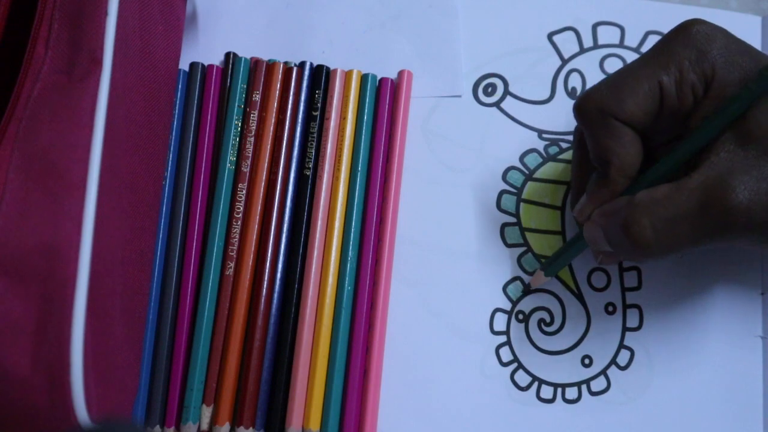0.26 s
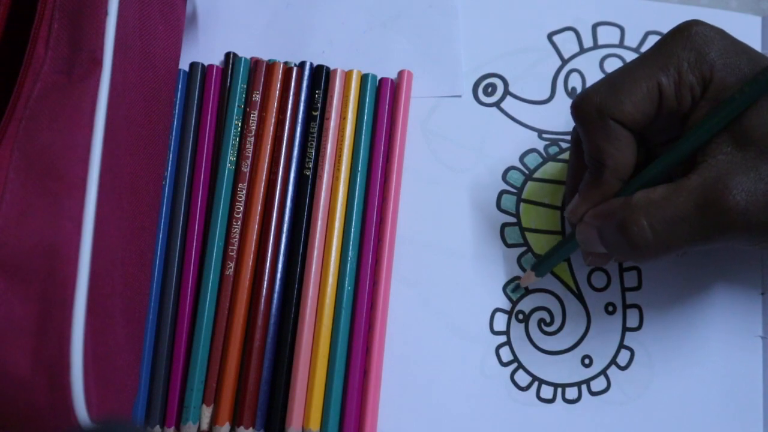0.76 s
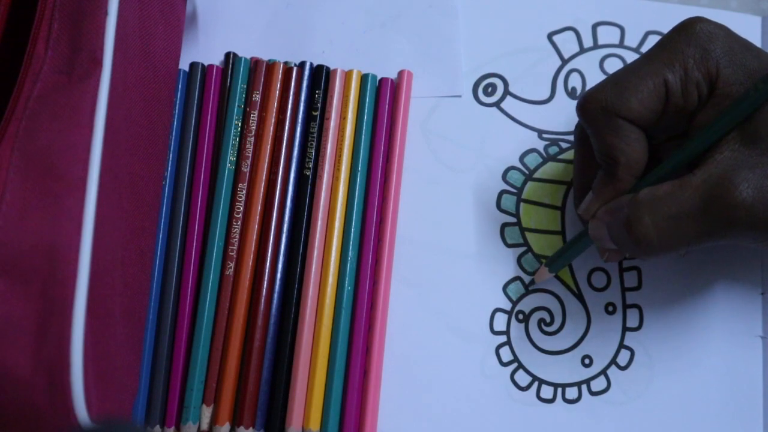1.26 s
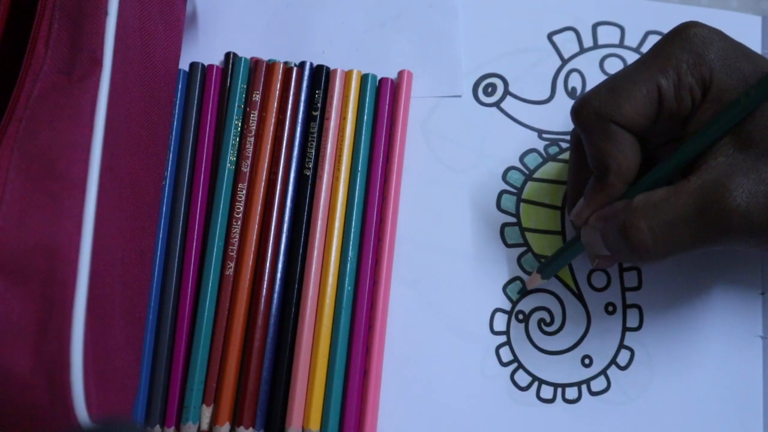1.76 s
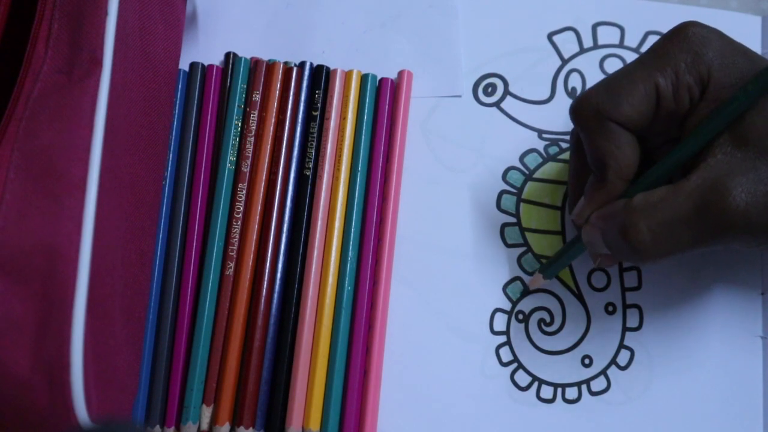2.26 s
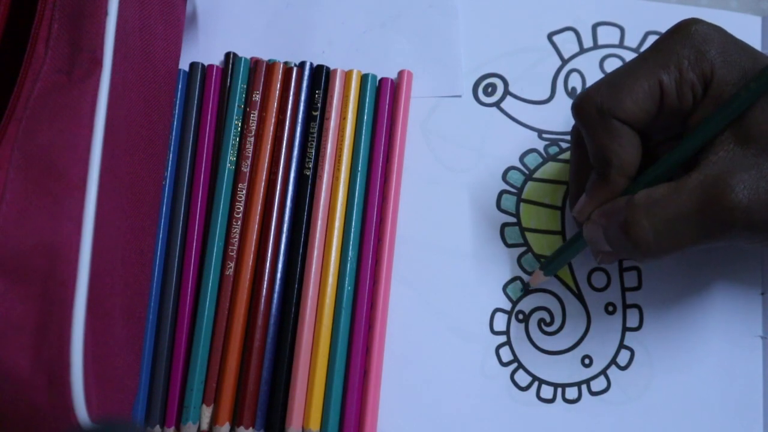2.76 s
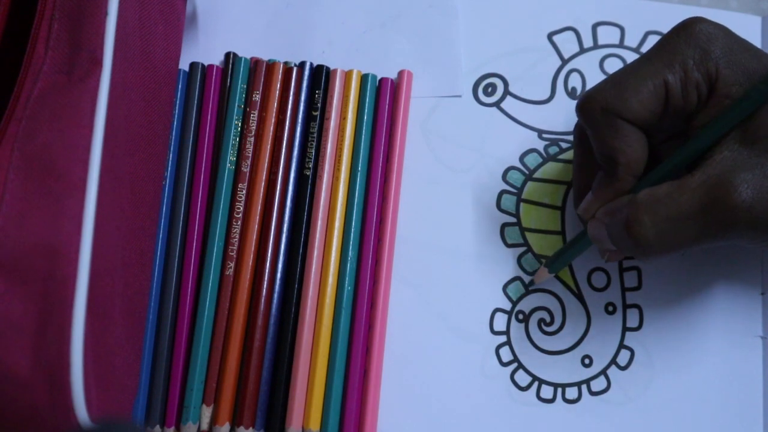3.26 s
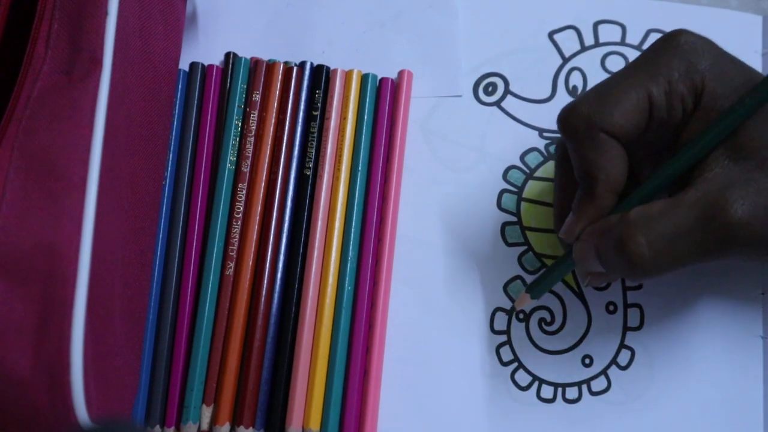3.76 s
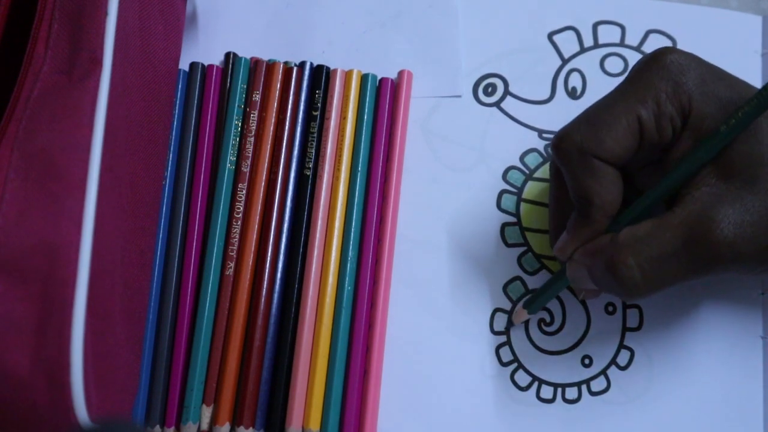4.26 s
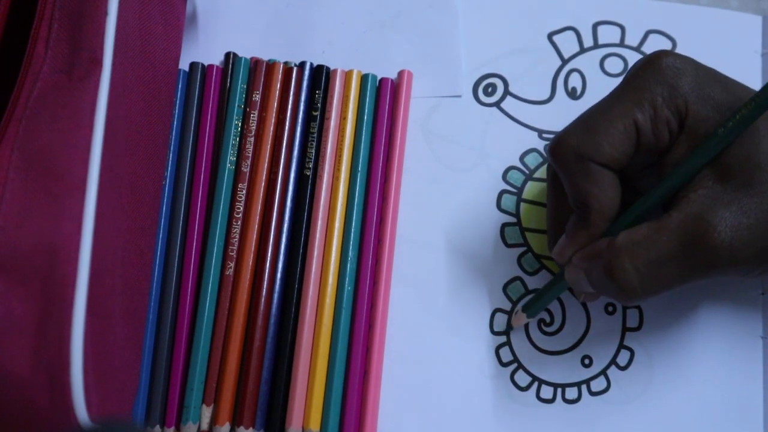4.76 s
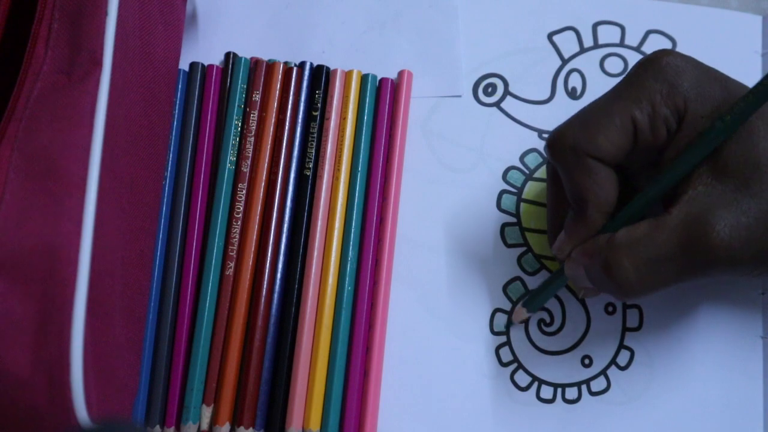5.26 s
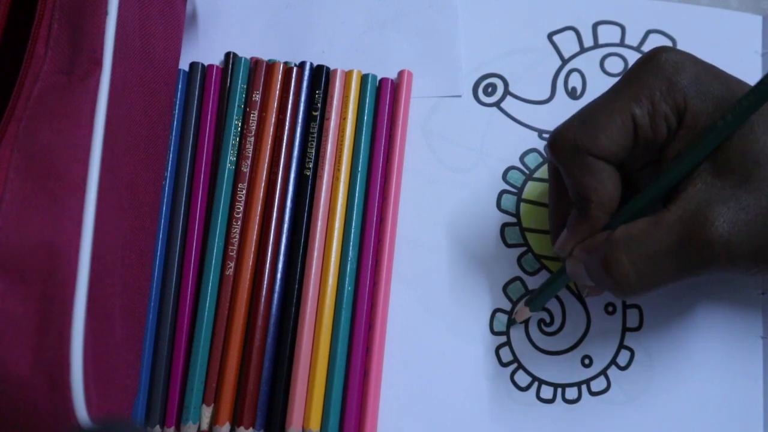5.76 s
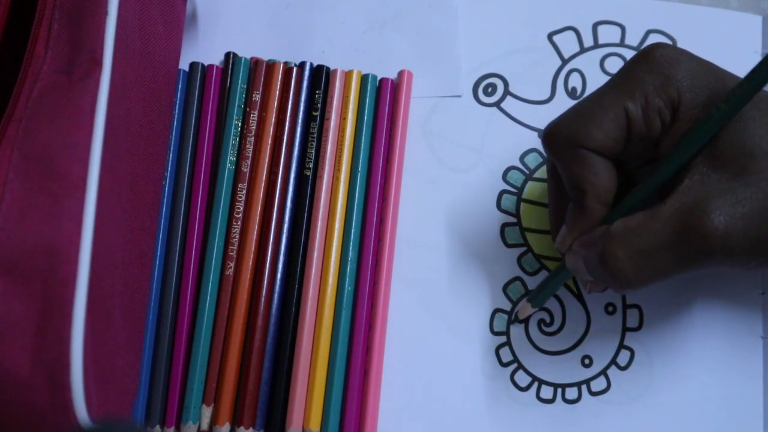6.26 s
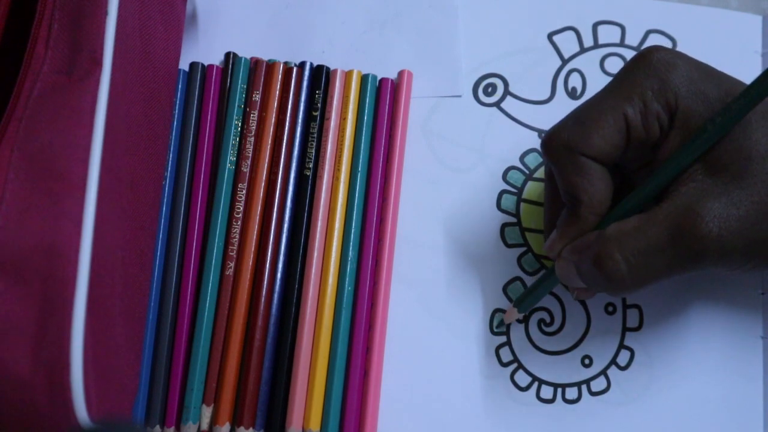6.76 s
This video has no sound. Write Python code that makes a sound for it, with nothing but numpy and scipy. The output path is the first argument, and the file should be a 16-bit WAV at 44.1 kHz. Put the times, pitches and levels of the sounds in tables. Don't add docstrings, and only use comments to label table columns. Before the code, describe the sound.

A coloured pencil scratches paper in quick back-and-forth strokes, pauses briefly with a tiny tap, then resumes, over quiet room hum.

```python
import sys
import numpy as np
from scipy import signal
from scipy.io import wavfile
from scipy.ndimage import uniform_filter1d

SR = 44100
rng = np.random.default_rng(int(sys.argv[2]) if len(sys.argv) > 2 else 0)


def linear_from_db(decibels):
    return 10 ** (np.asarray(decibels, float) / 20)


def to_wav(sig):
    pcm = np.clip(np.atleast_2d(sig), -1, 1) * 32767
    pcm = np.round(pcm).astype(np.int16)
    wavfile.write(sys.argv[1], SR, pcm.T)


N = 309141


def evened(x):
    return x / np.sqrt(np.mean(abs(x) ** 2) + 1e-20)


def read(points, hz):
    f, value = np.transpose(points)
    return np.interp(np.log(hz + 1), np.log(f + 1), value)


def wander(rate_hz):
    low_pass = signal.butter(2, rate_hz, fs=SR, output="sos")
    return evened(signal.sosfilt(low_pass, rng.standard_normal(N + SR))[SR:])


def strokes():
    # (start [s], length [s], level [dB])
    first_patch = [(0.0, 0.056, -46.5), (.106, 0.08, -50.5), (.236, 0.078, -50.5), (.351, 0.08, -49.5),
                   (.473, 0.083, -50), (.609, 0.06, -46.5), (.719, 0.062, -46.5), (.824, .064, -48.5),
                   (.93, .16, -53.5), (1.097, 0.066, -52), (1.251, 0.1, -54), (1.377, 0.062, -51),
                   (1.542, 0.064, -58.5), (1.636, 0.075, -52), (1.776, .061, -52.5), (1.882, .078, -51.5),
                   (1.989, 0.073, -48.5), (2.118, 0.072, -49.5), (2.221, .11, -50.5), (2.35, 0.081, -50),
                   (2.469, 0.084, -51.5), (2.602, 0.081, -50), (2.705, 0.12, -52), (2.824, 0.11, -52),
                   (2.947, 0.084, -55), (3.057, 0.072, -55), (3.201, 0.15, -54), (3.343, .12, -57),
                   (3.52, 0.08, -57.5), (3.636, .07, -66)]
    # (start [s], length [s], level [dB])
    second_patch = [(4.15, 0.06, -57), (4.239, .078, -49.5), (4.364, 0.097, -50), (4.492, 0.083, -48),
                    (4.631, .071, -49.5), (4.742, 0.084, -52.5), (4.88, 0.089, -53), (5.003, .079, -48.5),
                    (5.13, 0.083, -50.5), (5.234, .062, -47), (5.342, .094, -48.5), (5.476, 0.083, -46.5),
                    (5.606, .094, -49), (5.732, .084, -46), (5.866, 0.09, -51), (5.997, .069, -50),
                    (6.117, 0.071, -47.5), (6.211, .1, -47.5), (6.363, 0.08, -48), (6.495, .11, -55),
                    (6.648, 0.061, -51.5), (6.748, .071, -57.5), (6.928, .043, -56)]
    fastest = [(0.24, .4), (0.12, 0.3)]
    lean = [(0.37, 0.74), (0.18, 0.85)]
    # (pull [dB], push [dB])
    press_db = [(0.14, 0.25), (-1.8, 0.8)]
    usual_db, drag_db_per_db = -50.5, 0.21
    slide_s, slide_db = 3.641, 11.
    rows = []
    for patch, table in enumerate([first_patch, second_patch]):
        for count, (start_s, length_s, db) in enumerate(table):
            way = (count + patch) % 2
            weight_db = press_db[patch][way] + drag_db_per_db * (usual_db - db)
            weight_db += slide_db * (abs(start_s - slide_s) < .04)
            rows.append((start_s, length_s, db, fastest[patch][way], lean[patch][way], weight_db))
    return np.array(rows)


def hand(edge_db=-11, squareness=3.25, bite=3.3, settle_db=-13, settle_s=0.024):
    t, power = np.arange(N) / SR, np.zeros(N)
    for start_s, length_s, db, fastest, *_ in strokes():
        top_s = start_s + length_s * np.clip(fastest, .1, .9)
        rise = (top_s - t) / (top_s - start_s)
        fall = (t - top_s) / (start_s + length_s - top_s)
        away = np.minimum(np.where(t < top_s, rise, fall), 6)
        power += linear_from_db(db + edge_db * away ** np.where(t < top_s, bite, squareness)) ** 2
    keep = np.exp(-1 / (settle_s * SR))
    rustle = signal.lfilter([1 - keep], [1, -keep], power)
    return np.sqrt(power + linear_from_db(settle_db) ** 2 * rustle)


def tooth(per_s, spread_db):
    slips = rng.random(N) < per_s / SR
    size = linear_from_db(spread_db * np.minimum(rng.exponential(1, N), 4))
    return evened(slips * size * rng.choice([-1., 1.], N))


def pencil():
    # (frequency [Hz], level [dB])
    first_mid = [(900, -17), (1900, -12), (3200, -19), (4500, -14), (5500, -23), (6200, -16), (6600, -17.5),
                 (7200, -12), (8600, -23.5), (10000, -3.5), (11200, -16), (11700, -14.5), (13000, -26),
                 (14500, -25)]
    first_side = [(900, -14), (2100, -11), (4500, -21), (6000, -21), (6700, -13), (7500, -11), (8700, -19),
                  (9500, -3), (10200, 2), (11200, -9), (11700, -5), (12600, -11), (13800, -15),
                  (15600, -26)]
    second_mid = [(900, -13), (1900, -10.5), (3200, -17), (4500, -13), (5500, -21.5), (6200, -14.5),
                  (6800, -23), (7500, -10.5), (8300, -23), (9500, -11.5), (10300, -5.5), (11600, -15),
                  (13000, -25), (14500, -34)]
    second_side = [(900, -18), (2100, -13), (4500, -17), (6100, -18), (6600, -9), (7200, -13), (8500, -17),
                   (9500, -3), (10300, 0), (11500, -3), (12100, -9), (13500, -15), (14700, -27),
                   (15600, -28)]
    # (frequency [Hz], gain [dB])
    push_gain = [(10300, 0), (11000, 3), (12200, 5), (13200, 10), (14500, 7)]
    # (frequency [Hz], phase [rad])
    port_lead = [(4500, 2.98), (7500, 1.65), (8500, 1.3), (10000, 1.62)]
    # (frequency [Hz], likeness [0-1])
    port_same = [(4500, 0.76), (5500, 0.3), (8300, 0.9), (9800, 1), (11800, 0.6), (13000, 0.4)]
    new_patch_s = 3.9
    speed = hand() * linear_from_db(1.05 * wander(47))
    hz, t, direct = signal.stft(speed * tooth(10000, 1.65), SR, nperseg=256)
    scattered = signal.stft(speed * tooth(12000, 2.5), SR, nperseg=256)[2]

    rows = strokes()
    middle_s = rows[:, 0] + rows[:, 1] / 2
    nearest = abs(t[:, None] - middle_s).argmin(1)
    lean, weight_db = rows[nearest, 4:].T
    shade_db = np.outer(read(push_gain, hz), np.clip(lean, -.5, 1.6) - .65)
    shade_db += np.outer(np.clip((8800 - hz) / 600, 0, 1), weight_db)
    angle = evened(uniform_filter1d(rng.standard_normal((len(rows), len(hz))), size=4, axis=1))
    shade_db += 1.84 * angle[nearest].T

    same = np.clip(read(port_same, hz), 0, 1)[:, None]
    lead = np.exp(1j * read(port_lead, hz))[:, None]
    mid = same * lead * direct + np.sqrt(1 - same ** 2) * scattered
    low_cut = np.clip(hz / 700, 0, 1) ** 2
    first_db = np.array([read(first_mid, hz), read(first_side, hz)])[:, :, None]
    second_db = np.array([read(second_mid, hz), read(second_side, hz)])[:, :, None]
    patch_db = np.where(t < new_patch_s, first_db, second_db)
    colour = linear_from_db(patch_db + shade_db) * low_cut[:, None]
    return linear_from_db(10.0) * signal.istft(np.array([mid, direct]) * colour, nperseg=256)[1][:, :N]


def air():
    # (frequency [Hz], density [dB per Hz])
    air_mid = [(20, -13), (34, -13), (44, -0.5), (60, -10), (80, -0.5), (112, -9), (200, -7.5), (540, -12),
               (620, -16), (1050, -18.5), (4330, -31.5), (7440, -39.5), (10100, -42), (14500, -57.5)]
    air_side = [(35, -47), (60, -10), (95, -11.5), (146, -1.5), (280, 2.5), (470, 2.5), (2220, -3),
                (6080, -13.5), (8570, -19.5), (10300, -18), (12100, -29), (14200, -31), (15800, -27)]
    # (frequency [Hz], width [Hz], boost [dB])
    room_modes = [(97, 3.8, 8.5), (136, 4.3, 5.5), (142.3, 12.6, 7), (239.7, 21, 3.5), (269.3, 10, 4),
                  (309.4, 11, -1), (392, 31, 3), (537.4, 23, 7.5)]
    # (frequency [Hz], share of the lift [0-1])
    stir_band = [(130, 0), (240, 0.88), (1300, 0.82), (2600, 0.87), (4500, 0)]
    mid_db, side_db = -48.5, -50.5
    stir_s, stir_length_s, stir_db = 2.8, 0.18, 4
    frames, hz = N // 1024 + 6, np.fft.rfftfreq(4096, 1 / SR)
    shape = (2, frames, 2049)
    z = rng.standard_normal(shape) + 1j * rng.standard_normal(shape)
    modes_db = sum(db / (1 + (2 * (hz - f) / width) ** 2) for f, width, db in room_modes)
    z *= linear_from_db(np.array([read(air_mid, hz), read(air_side, hz)]) + modes_db)[:, None]
    t = np.arange(frames) * 1024 / SR
    stir = np.exp(-((t - stir_s) / stir_length_s) ** 4)
    z *= linear_from_db(stir_db * np.outer(stir, read(stir_band, hz)))
    mid, side = signal.istft(z.transpose(0, 2, 1), nperseg=4096, noverlap=3072)[1][:, :N]
    side = linear_from_db(side_db) * evened(side)
    mid = linear_from_db(mid_db) * evened(mid)
    return np.array([mid - 0.031 * side, side]) * linear_from_db(.5 * wander(0.9))


def machines():
    # (time [s], level [dB])
    hum_points = [(0.0, -50), (0.1, -56), (0.17, -65), (0.33, -53), (0.68, -46), (1.27, -59), (1.58, -54),
                  (1.79, -64), (2.48, -48), (3.61, -44), (4.61, -48), (4.86, -63), (4.92, -53), (6.56, -44),
                  (7.01, -52)]
    t = np.arange(N) / SR
    hum_hz = 48.64 + 0.53 * wander(0.95)
    hum = linear_from_db(np.interp(t, *np.transpose(hum_points))) * np.sin(2 * np.pi * np.cumsum(hum_hz) / SR)
    fan_db = -54 + 2.0 * wander(3.2)
    fan_hz = 77.3 + 0.34 * wander(1.6)
    fan = linear_from_db(fan_db) * np.sin(2 * np.pi * np.cumsum(fan_hz) / SR)
    return np.sqrt(2) * (hum + fan)


def tick():
    # (time [s], level [dB])
    taps = [
        (3.7955, -48),
    ]
    out, t = np.zeros(N), np.arange(200) / SR
    for time_s, db in taps:
        out[round(time_s * SR):][:200] += linear_from_db(db - 60 * t / 0.0065) * rng.standard_normal(200)
    band = signal.butter(2, (6500, 12000), "bandpass", fs=SR, output="sos")
    snap = signal.sosfilt(band, out)
    return np.array([snap, .4 * snap])


def scene():
    mid, side = pencil() + air() + tick()
    mid = mid + machines()
    return np.array([mid + side, mid - side])


def band_limit(x):
    return signal.sosfilt(signal.butter(12, 15800, fs=SR, output="sos"), x)


def record(dry):
    mix = dry + .0004
    return band_limit(mix)


dry = scene()
out = record(dry)
to_wav(out)
```